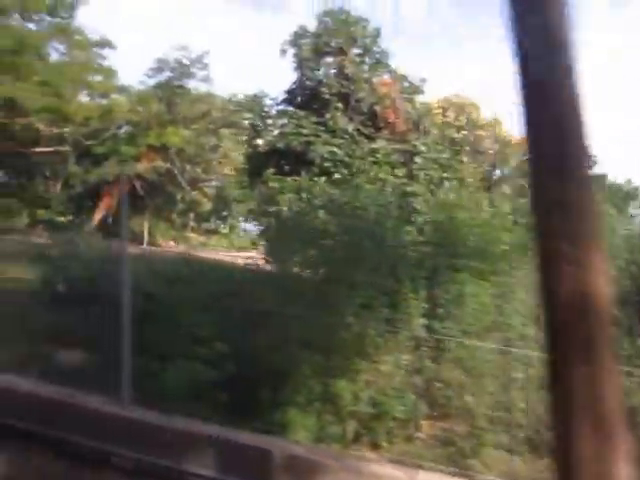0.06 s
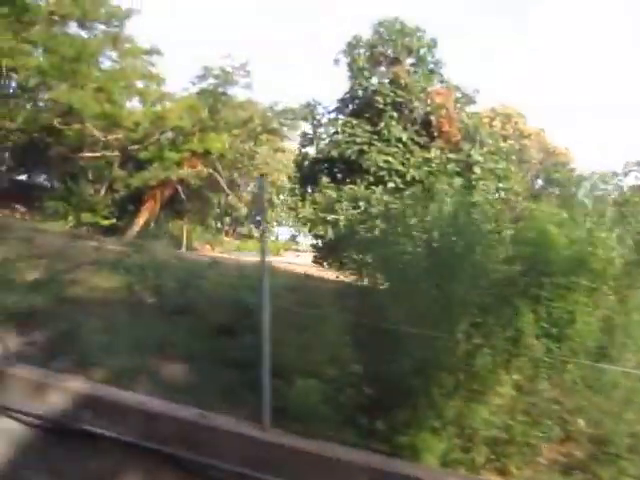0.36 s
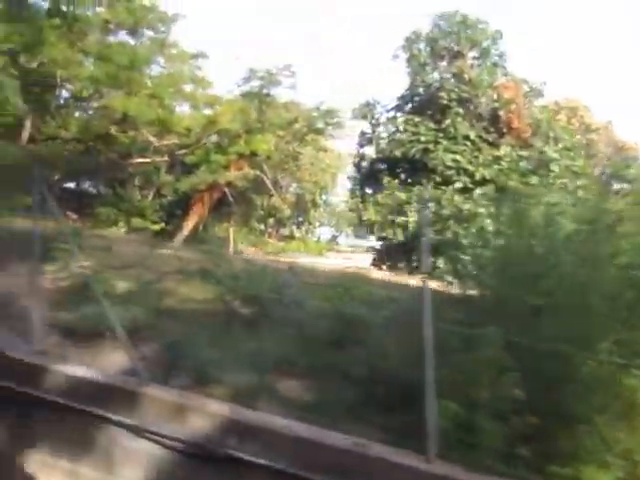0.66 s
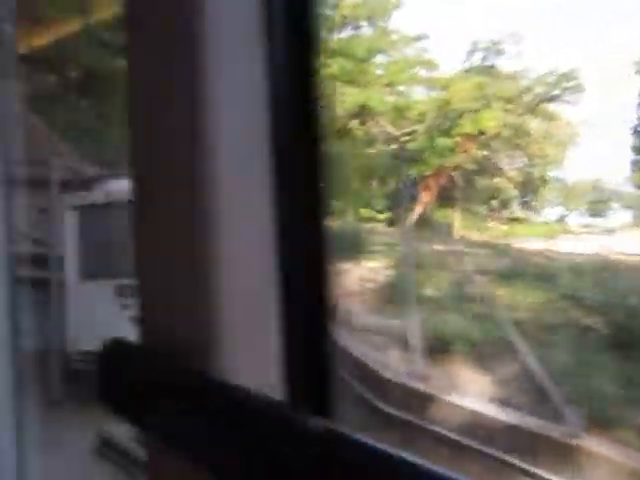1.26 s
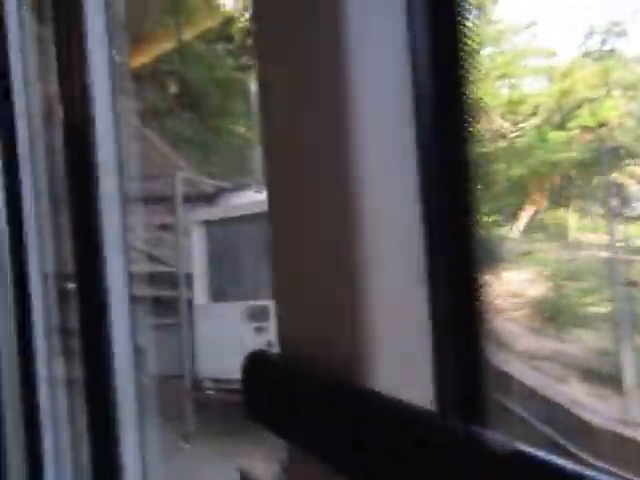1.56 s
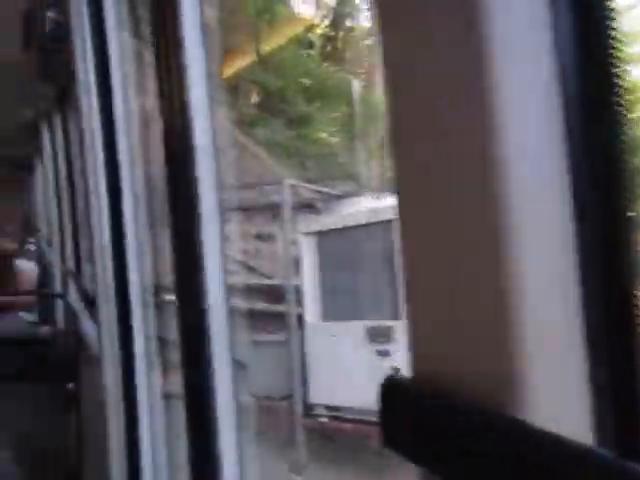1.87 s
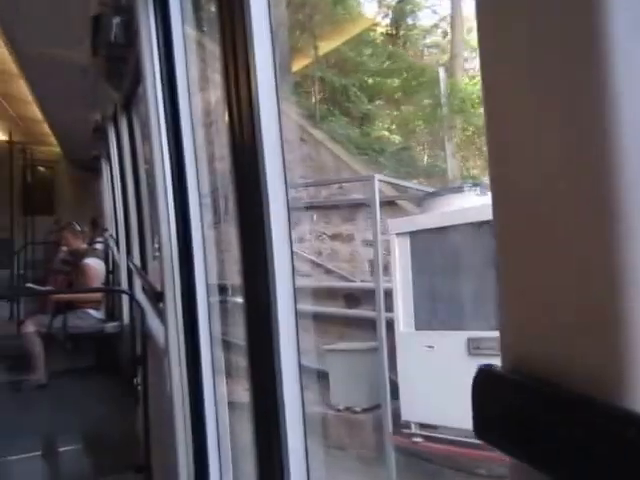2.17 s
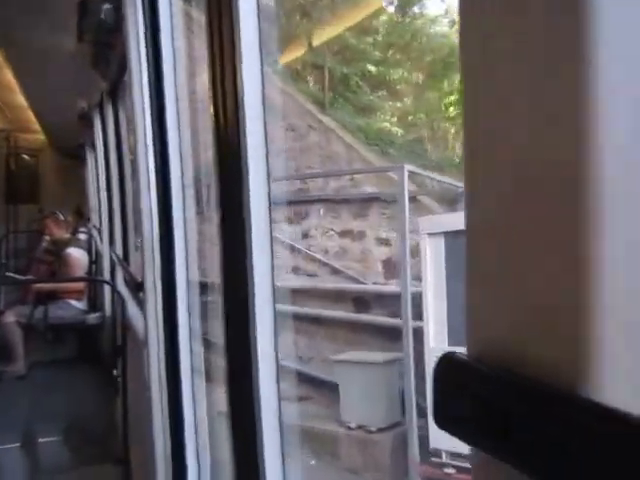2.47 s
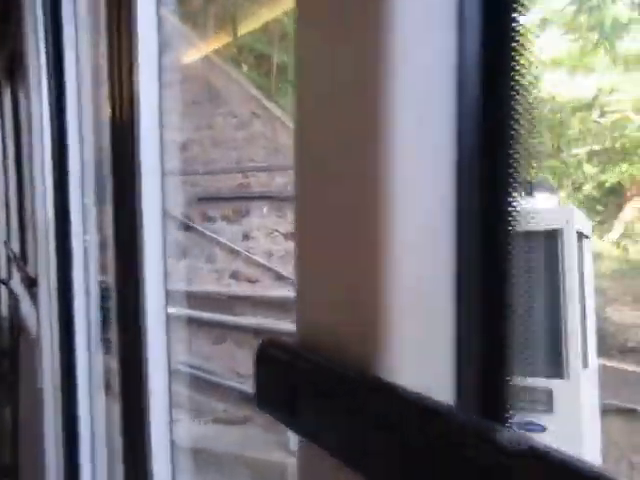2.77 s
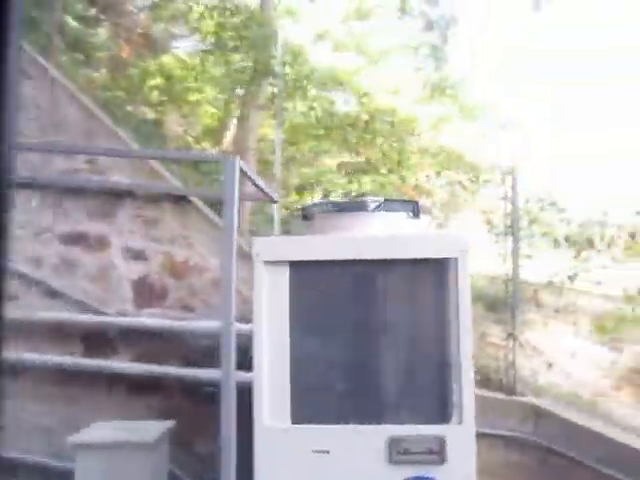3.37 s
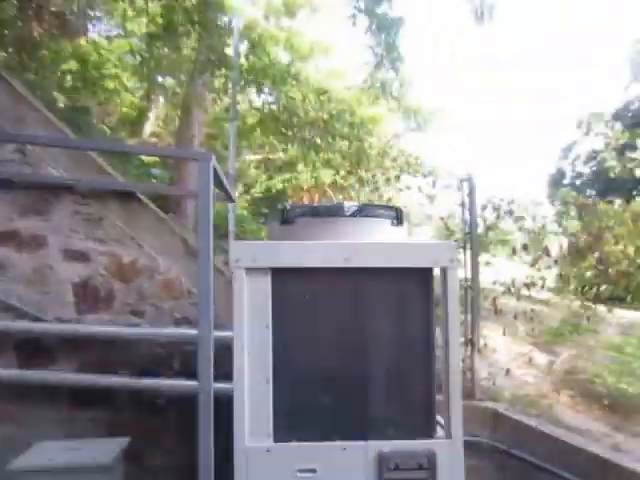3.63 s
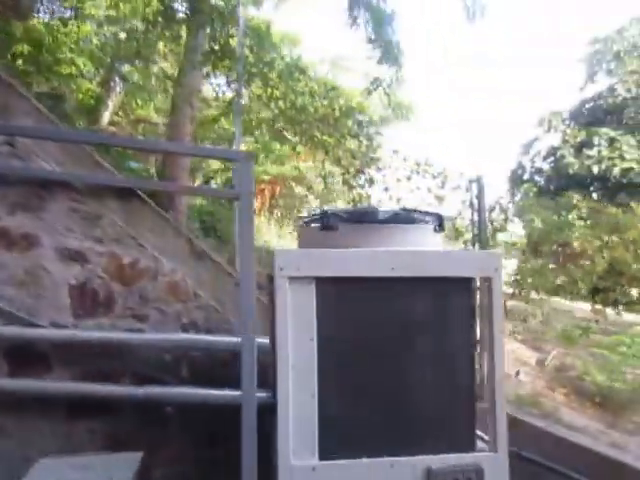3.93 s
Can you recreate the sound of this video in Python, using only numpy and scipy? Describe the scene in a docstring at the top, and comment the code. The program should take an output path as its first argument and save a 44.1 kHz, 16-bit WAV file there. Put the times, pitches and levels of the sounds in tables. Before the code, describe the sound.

Funicular carriage rumbling along rails, heard from inside, with brief knocks over rail joints.

```python
"""Steel wheels roll on rails, heard inside a funicular carriage, and twice knock over a rail joint,
the second time after a short metallic swish and with two duller rebounds. Impacts set the bogie and
floor ringing; rough track drives the panels, so they rumble and drone, while the body sways and booms.
Behind this the window frame ticks, a cooling unit beside the line hisses past and electronics whine
faintly. Halfway through, the sound drops out for an instant."""
import sys
import numpy as np
from scipy import signal
from scipy.fft import rfft, irfft
from scipy.io import wavfile
from scipy.ndimage import uniform_filter1d

SR = 44100
rng = np.random.default_rng(int(sys.argv[2]) if len(sys.argv) > 2 else 0)


def file_out(sig):
    """Save sig as 16-bit WAV at sys.argv[1]."""
    # one column per channel
    cols = np.atleast_2d(sig).T
    # limit, then scale
    lim = np.clip(cols, -1, 1)
    pcm = np.round(lim * 32767).astype(np.int16)
    wavfile.write(sys.argv[1], SR, pcm)


N = 176400
T = np.arange(N) / SR


def from_db(db):
    """Amplitude ratio: a factor of ten per 20 dB."""
    return 10 ** (np.asarray(db) / 20)


def rms_one(x):
    """Normalisation to unit rms."""
    return x / np.sqrt(np.mean(x ** 2) + 1e-20)


def level(rows):
    """Amplitude envelope, interpolated in decibels."""
    return from_db(np.interp(T, *np.transpose(rows)))


def drift(rate_hz):
    """Random modulation: low-passed noise of unit rms."""
    r = np.exp(-80 * np.pi * rate_hz / SR)
    slow = signal.lfilter([1], [1, -2 * r, r * r], rng.standard_normal(N // 40 + 2002))[2000:]
    return np.interp(np.arange(N) / 40, np.arange(len(slow)), rms_one(slow))


def noise(spectrum):
    """Spectral shaping: coloured noise of unit rms."""
    hz, db = np.transpose(spectrum)
    f = np.maximum(np.arange(N // 2 + 1) * SR / N, 1)
    skirts = np.minimum(f / hz[0], 1) ** 2 * np.minimum(hz[-1] / f, 1) ** 2
    colour = from_db(np.interp(np.log(f), np.log(hz), db))
    return rms_one(irfft(rfft(rng.standard_normal(N)) * skirts * colour, N))


def shaken(modes):
    """Random excitation: each resonance passes a band of noise."""
    out = 0
    for hz, width, db in modes:
        band = signal.butter(2, [max(hz - width / 2, 10), hz + width / 2], "band", fs=SR, output="sos")
        response = signal.sosfilt(band, rng.standard_normal(N + SR))[SR:]
        out = out + from_db(db) * rms_one(response)
    return out


def evened(x, samples):
    """Division by the running rms removes slow swells."""
    return x / np.sqrt(uniform_filter1d(x ** 2, samples) + 1e-12)


def ring(clicks, hz, t60):
    """Damped oscillator: each impulse starts a decaying sine."""
    r, w = from_db(-60 / (t60 * SR)), 2 * np.pi * hz / SR
    return signal.lfilter([0, np.sin(w)], [1, -2 * r * np.cos(w), r * r], clicks + 1e-18)


def burst(start, attack, t60, hold=0):
    """Transient envelope: linear rise, hold, exponential decay; times in s."""
    age = T - start
    return np.clip(age / attack, 0, 1) * np.exp(-np.log(1000) * np.maximum(age - attack - hold, 0) / t60)


# envelope of the hiss: t/s, level/dB
HISS_LEVEL = [(0, -58), (0.7, -59.5), (1.3, -62), (1.9, -61), (2.6, -62.5), (3.05, -59.5), (3.4, -56.5),
              (3.7, -58), (4, -61)]
# its spectrum: f/Hz, relative density/dB
HISS_SPECTRUM = [(2500, -7), (4200, -1), (5300, 0.5), (6100, 1), (7200, -1.5), (8000, -8.5), (9500, -14),
                 (11000, -29.5), (16000, -30.5)]


def hiss(flicker_db=1.0):
    """Broadband noise from outside swells as the cooling unit goes by."""
    return level(HISS_LEVEL) * noise(HISS_SPECTRUM) * from_db(flicker_db * drift(15))


# fan roar and airy rush at their nearest: f/Hz, bandwidth/Hz, level/dB
FAN_BANDS = [(660, 220, -39.5), (5440, 450, -64), (6940, 600, -66.5)]


def cooling_unit(nearest_s=3.84, half_width_s=0.41):
    """Attenuation with distance: the fan is loudest at closest approach."""
    return shaken(FAN_BANDS) / (1 + ((T - nearest_s) / half_width_s) ** 2)


# ticks of the frame: t/s, level/dB
TICKS = [(0.398, -50), (3.296, -49)]
# their spectrum: f/Hz, relative density/dB
TICK_SPECTRUM = [(3300, -9), (3800, 2), (4400, -9), (5500, -9), (8000, -19), (11000, -36), (14000, -35)]


def window_ticks():
    """Heavily damped transients: the window frame ticks lightly."""
    envelope = sum(from_db(db) * burst(s, attack=0.001, t60=0.035) for s, db in TICKS)
    return envelope * noise(TICK_SPECTRUM)


# resonances of the sprung body and of the cabin: f/Hz, bandwidth/Hz, relative level/dB
SWAY_MODES = [(25.8, 15.4, 0), (35.8, 7.3, -6.5)]
BOOM_MODES = [(51.6, 8.7, -7), (75.5, 16.6, -0.5)]
# their envelopes: t/s, gain/dB
SWAY_LEVEL = [(0, -10.5), (0.33, -25.5), (0.62, -19.5), (0.8, -22.5), (1.15, -25.5), (1.4, -27.5),
              (1.66, -18), (1.86, -27), (2.08, -20.5), (2.4, -27.5), (2.8, -30.5), (3.1, -19.5),
              (3.35, -27), (3.56, -34), (3.9, -21)]
BOOM_LEVEL = [(0, -29), (0.5, -29.5), (1.05, -24.5), (1.35, -31), (1.65, -32), (2.1, -30.5), (2.6, -29),
              (3.1, -33), (3.5, -34.5), (3.9, -31)]


def body(lurch_s=1.043, lurch_hz=25):
    """Mass-spring resonance: the body sways and lurches after the second joint; the cabin booms."""
    swing = np.sin(2 * np.pi * lurch_hz * (T - lurch_s))
    lurch = from_db(-8) * burst(lurch_s, attack=0.006, t60=0.71) * swing
    sway = level(SWAY_LEVEL) * evened(shaken(SWAY_MODES), samples=9000)
    return sway + lurch + level(BOOM_LEVEL) * shaken(BOOM_MODES)


# floor and wall resonances: f/Hz, bandwidth/Hz, relative level/dB
PANEL_MODES = [(138.3, 40, -11), (190.5, 23.3, -8.5), (278.4, 16, -16.5), (319.9, 25, -12),
               (371.8, 18.3, -18), (534.3, 37, -22.5)]
# broadband rumble: f/Hz, relative density/dB
RUMBLE_SPECTRUM = [(30, -21.5), (70, -5.5), (110, 3), (220, -4), (400, -8.5), (600, -15), (1000, -26.5),
                   (2000, -50.5)]
# envelope of both: t/s, gain/dB
RUMBLE_LEVEL = [(0, -23), (0.35, -27.5), (0.65, -23.5), (1.15, -29), (1.45, -32), (1.85, -29.5),
                (2.25, -28.2), (2.5, -24), (2.85, -27.5), (3.1, -29), (3.35, -32), (3.65, -36), (4, -30.5)]


def panel_rumble(uneven_db=0.53):
    """Forced vibration: rough track shakes the floor and wall panels."""
    panels = shaken(PANEL_MODES) + from_db(-1) * noise(RUMBLE_SPECTRUM)
    return level(RUMBLE_LEVEL) * panels * from_db(uneven_db * drift(25))


# floor resonances: f/Hz, bandwidth/Hz, relative level/dB
DRONE_MODES = [(110, 24, -3), (157, 48, 0), (376.5, 17, -2), (455, 40, -10), (533, 22, -10)]


def floor_drone():
    """Resonant response: a rough stretch of rail makes the floor drone, then fade."""
    envelope = from_db(-29) * burst(2.29, attack=0.13, hold=0.082, t60=2.4)
    return envelope * evened(shaken(DRONE_MODES), samples=6000)


# resonances of wheels and rail: f/Hz, bandwidth/Hz, relative level/dB
WHEEL_MODES = [(1018, 146, -4), (1022.2, 22, -8), (1187, 61, -12.5), (1513, 22, -18), (1702, 120, -14.5),
               (2460, 290, -21)]
RAIL_MODES = [(6050, 500, -3)]
# broadband roar: f/Hz, relative density/dB
ROAR_SPECTRUM = [(200, -20.5), (450, -1.5), (620, -2.5), (850, 1.5), (1200, -1.5), (1450, -6.5), (1800, -7),
                 (2100, -13.5), (2800, -17.5), (3600, -30), (5000, -41), (9000, -73.5)]
# envelopes of the three: t/s, gain/dB
WHEEL_LEVEL = [(0, -46), (0.65, -35.5), (1.3, -37.5), (2.1, -38), (2.8, -35), (3.35, -38.5), (3.65, -39.5),
               (3.9, -53)]
RAIL_LEVEL = [(0, -70), (.7, -59.5), (1.4, -68.5), (2.3, -72.5), (4, -73)]
ROAR_LEVEL = [(0, -34), (0.65, -33), (1.25, -36.5), (1.8, -33.5), (2.5, -35), (3.1, -37), (3.55, -37),
              (3.8, -38), (4, -39)]


def rolling(uneven_db=0.6):
    """Rolling noise: steel wheels ring and roar on the rails, which sing faintly."""
    wheels = level(WHEEL_LEVEL) * shaken(WHEEL_MODES) + level(ROAR_LEVEL) * noise(ROAR_SPECTRUM)
    return wheels * from_db(uneven_db * drift(10)) + level(RAIL_LEVEL) * shaken(RAIL_MODES)


# scrape of steel: f/Hz, relative density/dB
SWISH_SPECTRUM = [(2000, 7), (4200, -5), (5000, 4.5), (6300, -7), (7400, 3.5), (8600, -5), (10000, -13),
                  (11500, -40), (13500, -20), (16000, -33)]
# heave of the floor: f/Hz, bandwidth/Hz, relative level/dB
HEAVE_MODES = [(94, 33, -10), (210, 134, -7)]


def swish():
    """Friction noise: steel brushes steel, and the floor heaves as the wheel climbs onto the joint."""
    scrape = from_db(-41) * noise(SWISH_SPECTRUM)
    heave = from_db(-17.5) * evened(shaken(HEAVE_MODES), samples=2000)
    return burst(0.866, attack=0.027, hold=0.021, t60=0.065) * (scrape + heave)


# knocks at the joints: t/s, strength/dB, low thump gain/dB, steel ring gain/dB, cutoff f/Hz
KNOCKS = [(0.010, -3.5, 6, -13, 1400), (0.919, -0.5, -2, -0.5, 2200), (0.985, -8, -9, -21, 900),
          (1.052, -13.5, -3, -11, 1100)]
# the blow and rattle within a knock: delay t/s, relative level/dB
CONTACTS = [(0, -7.5), (.006, -1), (0.017, -0.5), (.032, -0.5)]
# modes of bogie and floor: f/Hz, relative level/dB, T60/s
BOGIE_MODES = [(25, -28.5, 0.72), (81.9, -26, 0.39), (184.9, -21.5, 0.41), (222, -21, 0.064),
               (320.5, -26, 0.27), (477, -29, 0.16), (585, -24.5, 0.12), (655, -25, 0.14),
               (1050, -24.5, 0.063), (1221, -27, 0.27), (1344, -27.5, .1), (1420, -32.5, 0.12),
               (2226, -35.5, 0.091)]
# diffuse clatter of the carriage: f/Hz, relative density/dB
CLATTER_SPECTRUM = [(60, -14.5), (200, 10), (620, -3), (850, -9.5), (1350, -6.5), (1900, -26),
                    (3000, -28.5), (4500, -41), (8000, -52), (11000, -73)]
# steel ringing on after the blow: f/Hz, bandwidth/Hz, relative level/dB
STEEL_MODES = [(4250, 300, -54.5), (4020, 900, -55), (8300, 700, -62), (12550, 400, -83.5)]


def joint_knocks(jitter_s=0.00151, scatter_db=4, thump_below_hz=200, floor_cut_hz=3100, rattle_db=2.5):
    """Impact excitation: runs of soft contacts ring the bogie's modes; clatter and steel ring decay."""
    contacts = [(s + delay, db + loss, thump, cutoff)
                for s, db, thump, _, cutoff in KNOCKS for delay, loss in CONTACTS]
    times, contact_db, thump_db, cutoff_hz = np.transpose(contacts)
    times = times + jitter_s * rng.uniform(-0.98, 1, len(times))
    onsets = np.clip(times * SR, 0, N - 1).astype(int)
    thud = clatter = steel = 0
    for hz, mode_db, t60 in BOGIE_MODES:
        scatter = scatter_db * rng.standard_normal(len(times))
        strength = from_db(contact_db + mode_db + scatter + thump_db * (hz < thump_below_hz))
        clicks = np.zeros(N)
        clicks[onsets] = strength / np.sqrt(1 + (hz / cutoff_hz) ** 4)  # soft contact is a low-pass
        thud = ring(clicks, hz, t60) - thud  # neighbouring modes swing in opposite senses
    thud = signal.sosfilt(signal.butter(2, floor_cut_hz, fs=SR, output="sos"), thud)
    for s, db, _, steel_db, _ in KNOCKS:
        clatter += from_db(db - 12.5) * burst(s, attack=0.0079, t60=0.26)
        steel += from_db(steel_db) * burst(s + 0.03, attack=0.012, t60=0.45)
    clatter *= noise(CLATTER_SPECTRUM)
    steel *= shaken(STEEL_MODES) * from_db(rattle_db * drift(40))
    return thud + clatter + steel


def scene():
    """Superposition: all sources add at the window, in one channel."""
    carriage = body() + panel_rumble() + floor_drone() + rolling()
    return (carriage + hiss() + cooling_unit() + joint_knocks() + swish() + window_ticks())[None]


# whine of the electronics: f/Hz, level/dB
WHINE = [(10960, -93.5), (12866, -93), (15735, -95)]


def record(dry, flutter_db=1.5, dropout_s=(2.151, 2.217), dropout_db=-33.5, cutoff_hz=15800):
    """Gating and band limiting: a faint whine joins, the level drops briefly, the top is cut."""
    whine = sum(np.sqrt(2) * from_db(db + flutter_db * drift(12)) * np.sin(2 * np.pi * hz * T)
                for hz, db in WHINE)
    gap = uniform_filter1d(((T > dropout_s[0]) & (T < dropout_s[1])) * 1.0, size=40)
    heard = (dry + whine) * (1 - gap + gap * from_db(dropout_db))
    return signal.sosfilt(signal.ellip(12, 0.1, 80, cutoff_hz, fs=SR, output="sos"), heard)


dry = scene()
out = record(dry)
file_out(out)
```